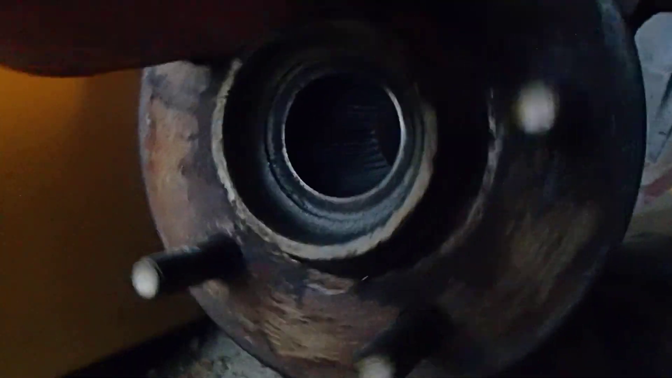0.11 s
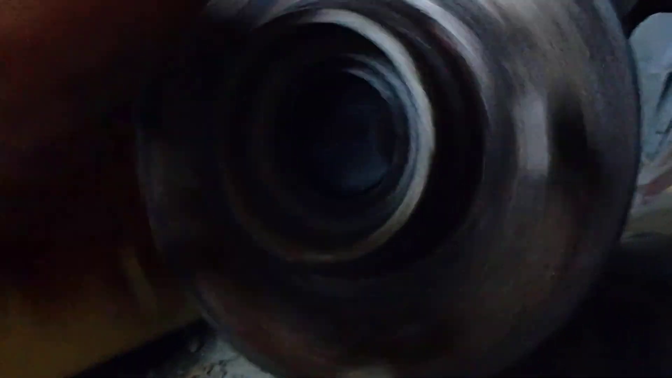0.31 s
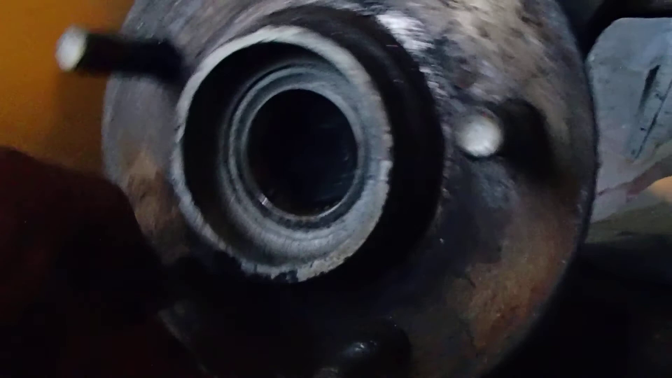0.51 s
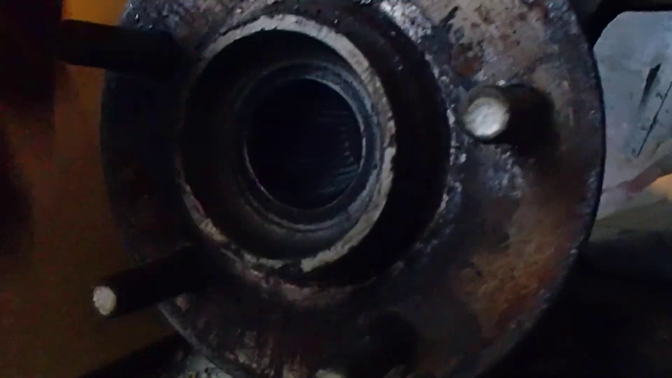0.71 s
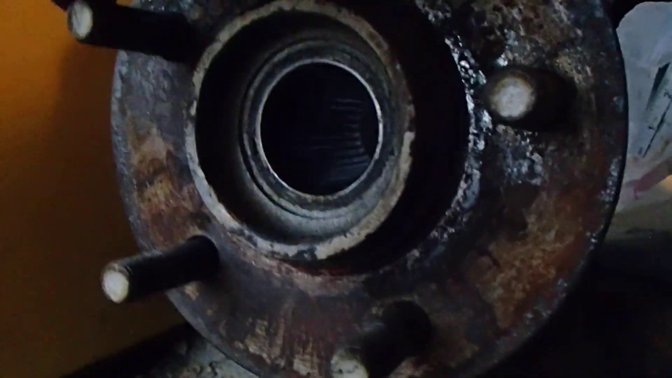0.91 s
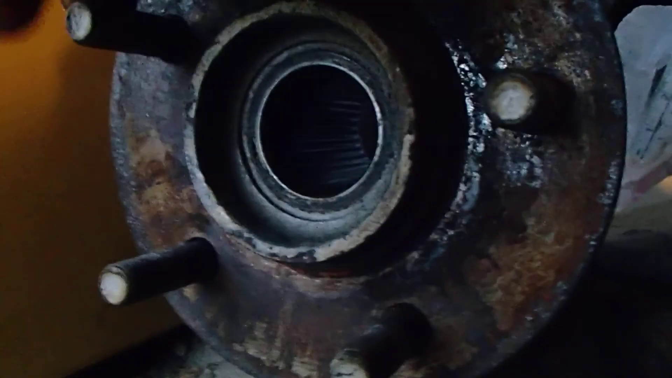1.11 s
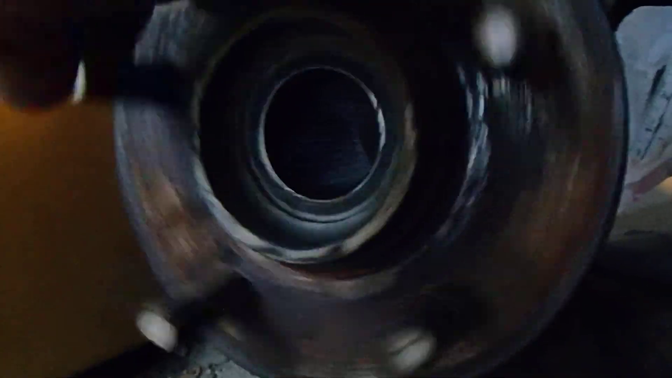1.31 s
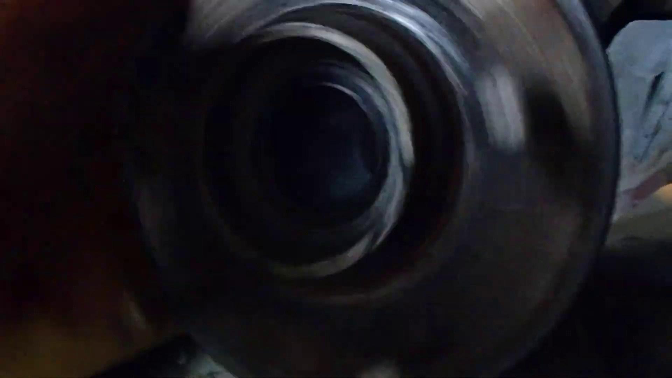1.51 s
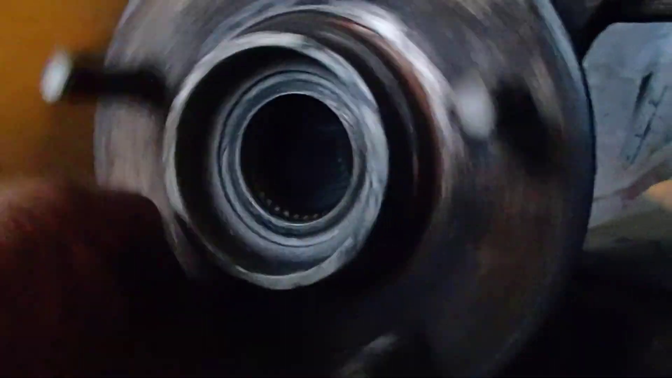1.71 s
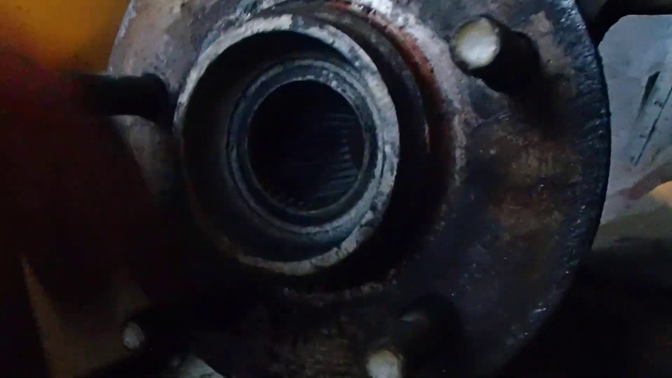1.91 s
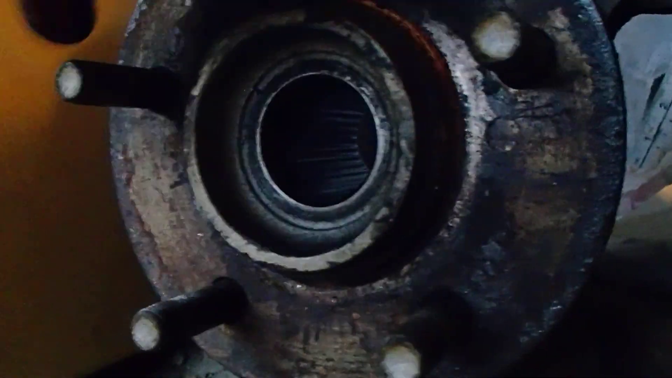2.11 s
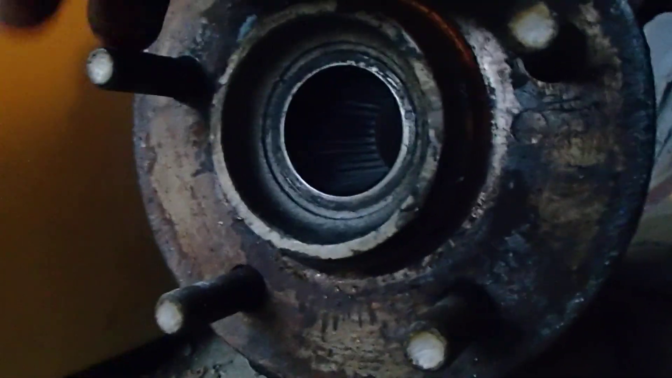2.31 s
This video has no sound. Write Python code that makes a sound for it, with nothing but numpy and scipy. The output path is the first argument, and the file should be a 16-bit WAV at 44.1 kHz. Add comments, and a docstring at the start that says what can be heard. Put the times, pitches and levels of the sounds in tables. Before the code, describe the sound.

Dry metal bearing clicks and crunches as a wheel hub is turned twice, close up.

```python
"""A worn wheel hub turned twice by hand, close to one microphone in a quiet room with a steady hiss. At 0.2 s
and 0.4 s the dry bearing catches and lets go in a short crunch of tiny slips, the hand rubbing softly in
between; at 0.6 s a light knock sets the steel flange ringing. The second turn crunches at 1.4 s and 1.6 s,
knocks at 1.8 s and dies away in faint singing."""
import sys
import numpy as np
from scipy import signal
from scipy.fft import rfft, irfft
from scipy.io import wavfile

SR = 44100
rng = np.random.default_rng(int(sys.argv[2]) if len(sys.argv) > 2 else 0)


def file_out(sig):
    """Save sig as 16-bit WAV at sys.argv[1]."""
    # one column per channel
    cols = np.atleast_2d(sig).T
    # limit, then scale
    lim = np.clip(cols, -1, 1)
    pcm = np.round(lim * 32767).astype(np.int16)
    wavfile.write(sys.argv[1], SR, pcm)


N = 105840
T = np.arange(N) / SR


def bearing(size=4096):
    """Each slip is a dense, fading run of tiny contacts that cracks and shakes the bearing's modes."""
    # slips: t/s, length/s, low-mode level/dB, high-mode level/dB, crack level/dB
    slips = [(0.2219, 0.0047, -17, -21.5, -33.5), (0.2266, 0.0029, -19, -17, -39),
             (0.2308, 0.0038, -18.5, -21, -32.5), (0.361, 0.015, -41.5, -56, -47.5),
             (0.3779, 0.0026, -19, -23.5, -32), (0.382, 0.012, -24, -45, -39),
             (0.3939, 0.00075, -16, -33, -37), (0.397, 0.0032, -27, -40, -44),
             (0.3992, 0.0053, -21.5, -39, -53), (0.4092, 0.0024, -20, -28.5, -55),
             (1.4021, 0.0029, -20, -27.5, -42), (1.4046, 0.0036, -24.5, -24.5, -33.5),
             (1.411, 0.006, -24, -26.5, -38), (1.4141, 0.00064, -10.5, -40, -38),
             (1.5687, 0.01, -38.5, -53, -53), (1.581, 0.0025, -17, -23, -37),
             (1.5844, 0.0024, -12.5, -13.5, -30.5), (1.587, 0.0025, -18, -30, -35),
             (1.5914, 0.012, -18.5, -28, -37), (1.6006, .003, -22, -36, -45)]
    # damped modes of the loaded bearing: f/Hz, width/Hz, level/dB
    bearing_modes = [(2200, 210, -19), (2530, 160, -17.5), (2910, 100, -13), (3372, 104, -5),
                     (3527, 37, -2.5), (3590, 93, -0.5), (3860, 90, -9), (5116, 103, -5.5),
                     (5370, 127, -8.5), (6195, 54, 3.5), (6370, 200, -4), (6800, 170, 0.5),
                     (7070, 120, -16), (7400, 180, -3), (7920, 140, -15), (9020, 170, -10),
                     (9920, 89, -4.5)]
    # how well the contacts shake the modes: f/Hz, level/dB
    shake_spectrum = [(500, -14.5), (1700, -7.5), (2800, 2.5), (3800, 3.5), (4500, -8), (5200, 2.5),
                      (7500, -9.5), (10500, -16), (13000, -21)]
    # colour of the bare crack: f/Hz, level/dB
    crack_spectrum = [(200, -7), (550, -12), (800, 4), (1600, -2.5), (3000, 2.5), (4500, 1), (5200, 4),
                      (5750, -15), (6300, 5.5), (7800, 2), (8700, -9.5), (10200, -4.5), (12000, -14),
                      (16000, -9.5)]
    contacts_per_s, spread_db, fade_db, split_hz = 6400, 3, 2.5, 4500
    out, t = np.zeros(N), np.arange(size) / SR
    for start, length, low_db, high_db, crack_db in slips:
        touching = ((rng.random(size) < contacts_per_s / SR) & (t < length)) | (t == 0)
        strength_db = spread_db * rng.standard_normal(size) - fade_db * np.minimum(t / length, 1)
        contacts = touching * rng.choice([-1, 1], size) * from_db(strength_db)
        shake = colour(contacts, shake_spectrum)
        modes = [(hz, from_db(db) * resonate(shake, hz, width)) for hz, width, db in bearing_modes]
        low = unit_rms(sum(mode for hz, mode in modes if hz < split_hz))
        high = unit_rms(sum(mode for hz, mode in modes if hz >= split_hz))
        crack = unit_rms(colour(contacts, crack_spectrum))
        slip = from_db(low_db) * low + from_db(high_db) * high + from_db(crack_db) * crack
        add(out, slip * np.sqrt(length * SR / size), start)  # energy grows with the slip's length
    return out


def flange():
    """Knocks ring the flange; a close pair of modes beats, and load on the bearing shortens the ring."""
    # free modes (the lowest, the beating one, then the upper ones): f/Hz, level/dB, t60/s
    modes = [(3307, -1, 0.35), (4160, 0.5, 0.47), (4720, 0, 0.24), (5545, 4, 0.19), (6580, -7.5, 0.31),
             (6580, -6.5, 0.45), (8100, -13.5, 0.37), (10150, -14.5, 0.37), (11000, -16, .18)]
    # knocks: t/s, lowest level/dB, beating level/dB, upper level/dB, share of free ring time, rise/s
    knocks = [(.229, -30, -45, -43, 0.41, 0.0032), (.403, -16, -54, -39.5, 0.24, 0.0017),
              (.624, -33.5, -31, -52.5, 0.75, 0.0034), (1.412, -20.5, -44, -44.5, 0.54, 0.0065),
              (1.596, -16, -44, -36.5, 0.22, 0.0018), (1.843, -37, -32.5, -45, 0.41, 0.016)]
    beat_hz, twin_gain = 13.5, 0.5
    out, t = np.zeros(N), T[:SR // 2]
    for start, lowest_db, pair_db, upper_db, share, rise in knocks:
        lowest, pair, *upper = [from_db(db - 60 * t / (t60 * share)) * np.exp(2j * np.pi * hz * t)
                                for hz, db, t60 in modes]
        pair = pair * (1 + twin_gain * np.exp(2j * np.pi * beat_hz * t))
        ring = from_db(lowest_db) * lowest + from_db(pair_db) * pair + from_db(upper_db) * sum(upper)
        attack = 1 - np.exp(-t / rise)
        add(out, np.sqrt(2) * ring.imag * attack, start)
    return out


def squeaks():
    """Friction briefly keeps one mode singing: the bearing chirps under load, the flange sings faintly."""
    # friction tones: t/s, length/s, f/Hz, level/dB
    tones = [(0.229, 0.012, 3516, -11), (0.2225, 0.015, 6130, -24), (1.412, 0.0088, 6190, -21),
             (1.5396, 0.0021, 6300, -35), (1.677, 0.15, 3305, -54), (1.73, 0.27, 3300, -49),
             (1.855, 0.075, 5545, -48.5), (1.90, 0.18, 4170, -55.5), (2.11, .15, 5545, -60.5)]
    return np.sqrt(2) * sum(swell(start, length, db) * np.sin(2 * np.pi * (hz * T + rng.random()))
                            for start, length, hz, db in tones)


def brushing():
    """Dry brushing as the hub moves: short swells of hiss with an airy top."""
    # brushes: t/s, length/s, hiss level/dB, air level/dB
    brushes = [(0.352, 0.025, -57, -51), (.49, 0.076, -56, -62), (.622, .006, -50, -56),
               (1.567, .03, -43, -47), (1.738, 0.078, -55.5, -62), (1.83, 0.056, -56, -54)]
    # colour of the hiss: f/Hz, level/dB
    hiss_spectrum = [(2000, -31), (6000, 2), (10000, -5), (15000, -1)]
    # colour of the airy top: f/Hz, level/dB
    air_spectrum = [(9000, -25), (12500, -4), (15000, -2)]
    hiss, air = noise(hiss_spectrum), noise(air_spectrum)
    return sum(hiss * swell(start, length, hiss_db) + air * swell(start, length, air_db)
               for start, length, hiss_db, air_db in brushes)


def hand_rub():
    """The hand rubbing the hub gives soft, dull rumbles as it turns."""
    # rumbles: t/s, length/s, level/dB
    rumbles = [(0.271, .013, -35), (0.274, 0.075, -42), (0.366, 0.033, -45), (1.393, 0.065, -43.5),
               (1.491, 0.029, -42), (1.51, 0.054, -46), (1.555, .05, -46.5)]
    # colour of the rumble: f/Hz, level/dB
    spectrum = [(200, -17), (550, -15.5), (750, 1), (1250, -0.5), (1800, -10.5), (4000, -15), (8000, -32),
                (15000, -55)]
    return noise(spectrum) * sum(swell(start, length, db) for start, length, db in rumbles)


def room(x, t60_s=0.17, delay_s=0.0032, level_db=-22.5):
    """The room returns a short diffuse tail, faint this close to the hub."""
    t = T[:SR // 2]
    tail = rng.standard_normal(len(t)) * from_db(-60 * t / t60_s) * (t > delay_s)
    return from_db(level_db) * signal.fftconvolve(x, tail / np.sqrt(np.sum(tail ** 2)))[:N]


def background(hiss_db=-45.5, ring_db=-62.5):
    """Room tone: steady hiss with one faint resonance."""
    # colour of the room tone: f/Hz, level/dB
    spectrum = [(15, -64), (25, -11), (69, -14.5), (101, -7), (129, -10), (169, -7.5), (215, -10.5),
                (322, -6), (445, -9.5), (631, -3), (826, -3), (895, 0), (1530, -4), (2170, -2.5),
                (2360, -6.5), (2700, -4.5), (3440, -7.5), (4040, -6), (4620, -15), (5430, -15), (7100, -23),
                (14300, -26), (15500, -29)]
    hiss = noise(spectrum)
    ring = unit_rms(resonate(rng.standard_normal(N), hz=4203, width_hz=70))
    return from_db(hiss_db) * hiss + from_db(ring_db) * ring


def from_db(db):
    """Decibels to gain."""
    return 10 ** (np.asarray(db) / 20)


def unit_rms(x):
    """Scale to unit rms."""
    return x / np.sqrt(np.mean(x ** 2) + 1e-20)


def add(out, x, start_s):
    """Mix x into out from start_s on."""
    i = max(int(start_s * SR), 0)
    out[i:i + len(x)] += x[:max(N - i, 0)]


def colour(x, points):
    """Causal (minimum-phase) filter through points of f/Hz, level/dB."""
    n = len(x)
    hz, db = np.transpose(points)
    bin_hz = np.arange(n // 2 + 1) * SR / n
    gain = from_db(np.interp(np.log(bin_hz + 1), np.log(hz), db))
    cepstrum = irfft(np.log(gain), n)
    cepstrum[1:n // 2] *= 2  # fold onto positive time
    cepstrum[n // 2 + 1:] = 0
    return irfft(rfft(x) * np.exp(rfft(cepstrum)), n)


def noise(points):
    """Coloured noise of unit rms."""
    return unit_rms(colour(rng.standard_normal(N), points))


def resonate(x, hz, width_hz):
    """One resonance with unit gain at its top."""
    radius = np.exp(-np.pi * width_hz / SR)
    feedforward = np.array([1, 0, -1]) * (1 - radius ** 2) / 2
    feedback = [1, -2 * radius * np.cos(2 * np.pi * hz / SR), radius ** 2]
    return signal.lfilter(feedforward, feedback, x + 1e-18)


def swell(start_s, length_s, peak_db):
    """A smooth rise and fall."""
    return from_db(peak_db) * np.sin(np.pi * np.clip((T - start_s) / length_s, 0, 1)) ** 2


def scene():
    """The hub close to the microphone, the room around it, in mono."""
    hub = bearing() + flange() + squeaks() + brushing() + hand_rub()
    return (hub + room(hub) + background())[None]


def record(dry):
    """A steep low-pass cuts the very top."""
    cutoff_hz = 15750
    return signal.sosfilt(signal.ellip(12, .1, 80, cutoff_hz, fs=SR, output="sos"), dry)


dry = scene()
out = record(dry)
file_out(out)
```